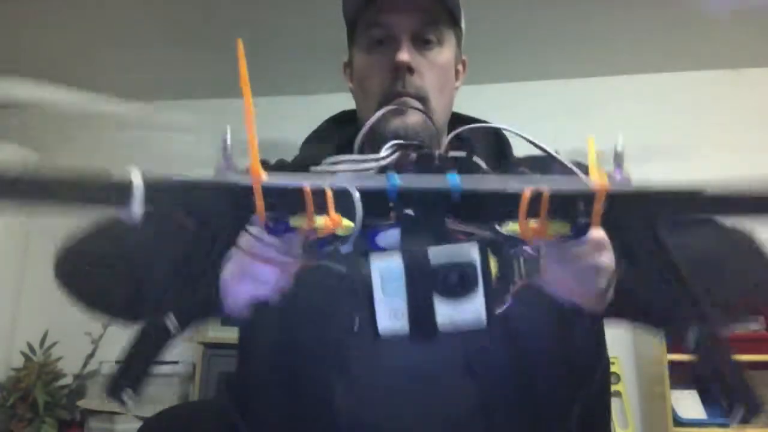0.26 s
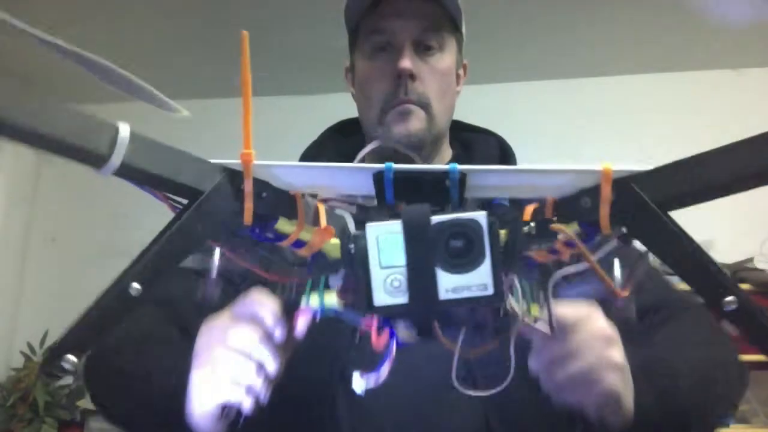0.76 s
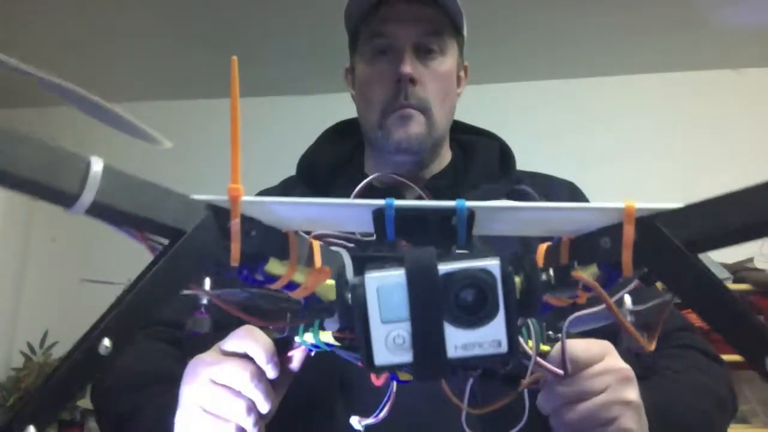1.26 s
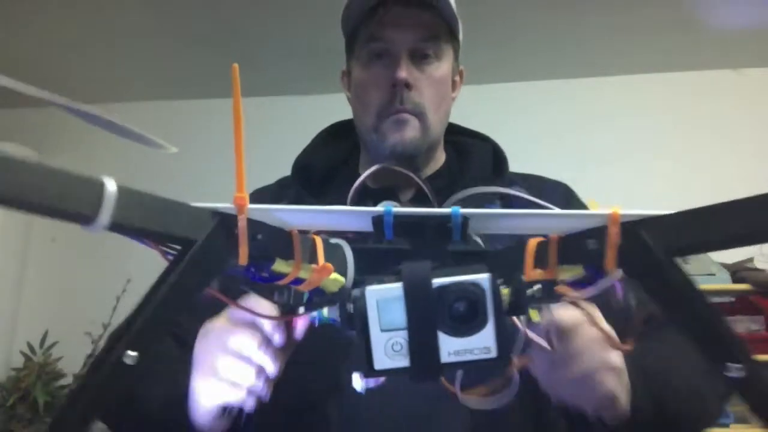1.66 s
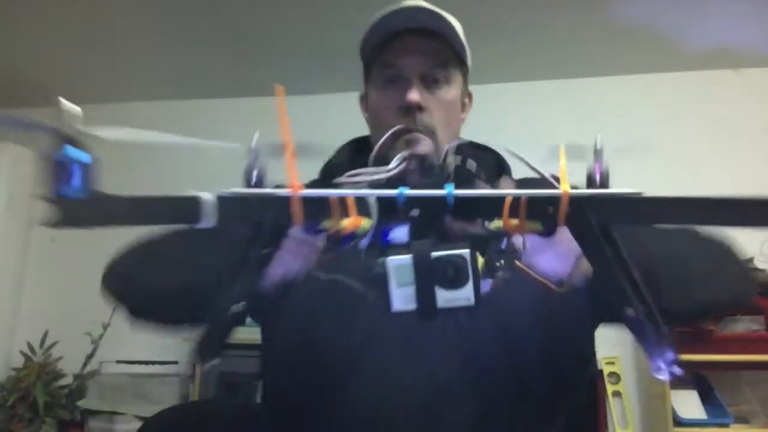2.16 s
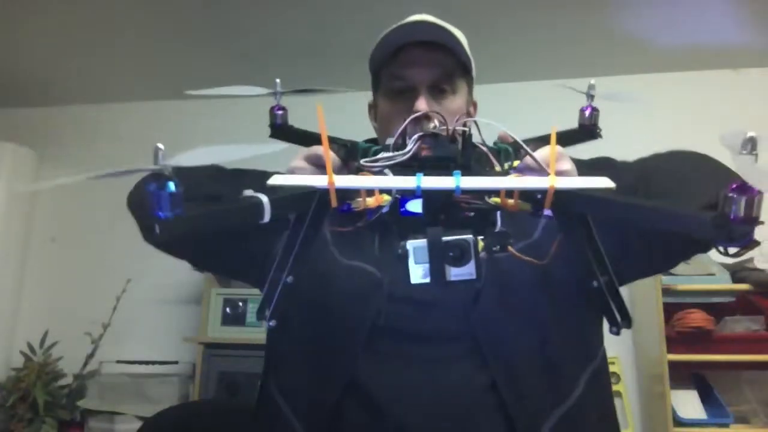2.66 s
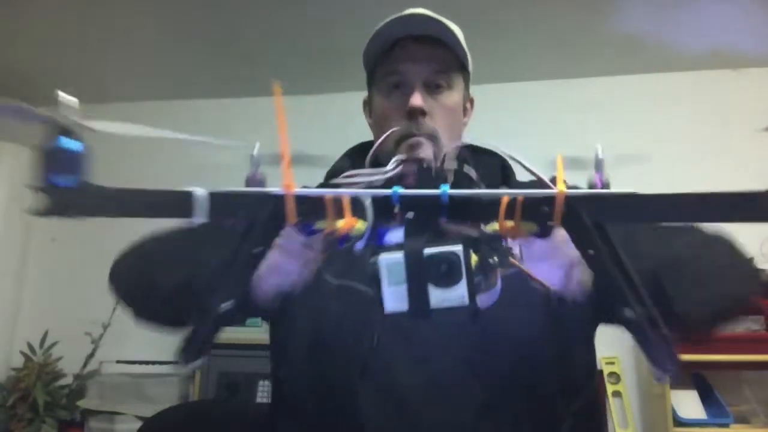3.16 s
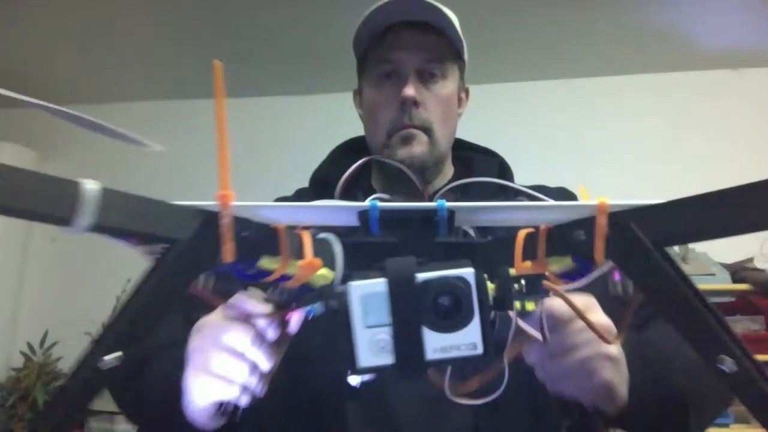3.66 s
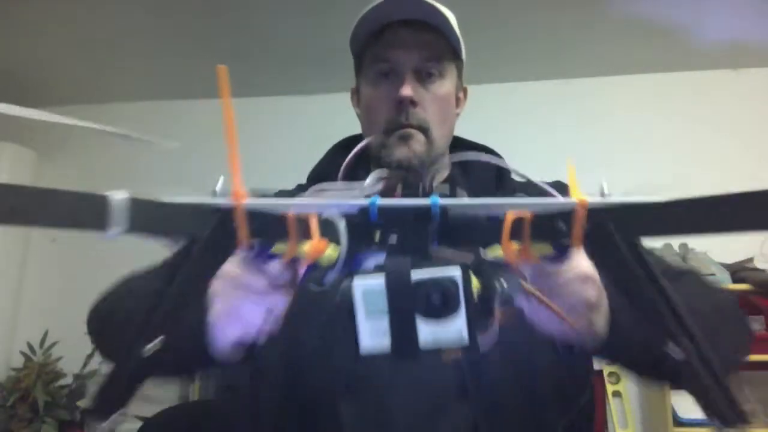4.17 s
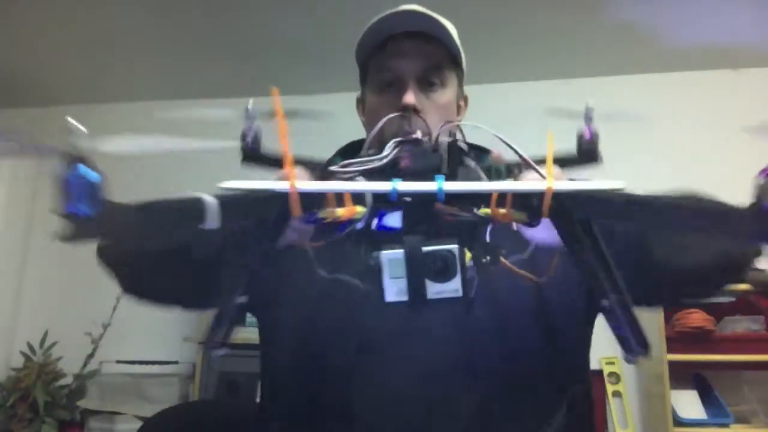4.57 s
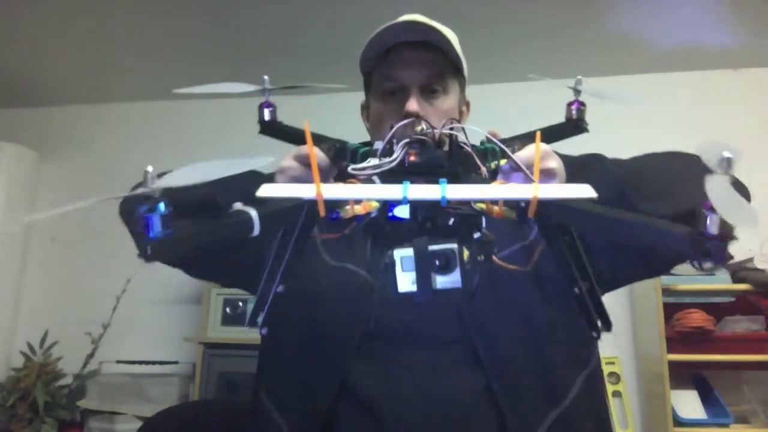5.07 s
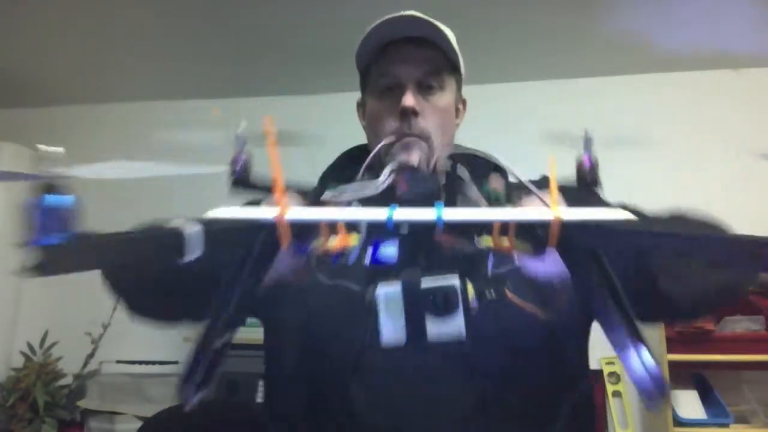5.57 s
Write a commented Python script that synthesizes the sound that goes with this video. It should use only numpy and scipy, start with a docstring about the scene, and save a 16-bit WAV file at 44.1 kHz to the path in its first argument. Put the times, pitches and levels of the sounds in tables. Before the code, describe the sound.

A small servo on a hand-held quadcopter chatters in dry, bright, buzzy ticks and rasps, starting and stopping over a faint steady electrical hum.

```python
"""Gear chatter of a hand-held quadcopter

A quadcopter is tilted to and fro indoors, and the servo of its camera mount works to follow. It takes a
command fifty times a second; each drive pulse jerks the small motor, and uneven gear strikes ring the case.
The airframe adds short knocks and fingers rustle on it, and sparse reflections give the room.
Mains hum, a stack of steady tones, lies underneath with shaped noise as hiss.
"""
import sys
import numpy as np
from scipy import signal
from scipy.fft import rfft, irfft
from scipy.io import wavfile
from scipy.ndimage import uniform_filter1d

SR = 44100
rng = np.random.default_rng(int(sys.argv[2]) if len(sys.argv) > 2 else 0)


def unload_wav(signal):
    """Save mono or channel-first audio to the path in sys.argv[1] as 16-bit WAV at rate SR, clipped to [-1, 1]."""
    wavfile.write(
        sys.argv[1],
        SR,
        np.round(np.clip(np.atleast_2d(signal).T, -1, 1) * 32767).astype(np.int16),
    )


N = 255780
FRAME_HZ = 50.065  # servo command rate


def gain_of(db):
    """Decibels to amplitude."""
    return 10 ** (np.asarray(db) / 20)


def evened(x):
    """Scales to rms 1."""
    return x / np.sqrt(np.mean(x ** 2) + 1e-20)


def add(mix, s, sound):
    """Mixes a sound in at s seconds, cut off at the end of the mix."""
    part = mix[..., round(s * SR):][..., :sound.shape[-1]]
    part += sound[..., :part.shape[-1]]


def wobble(rate):
    """Slow random curve of rms 1: eight sines up to rate (Hz), the slower ones stronger."""
    t = np.arange(0, N, 256) / SR
    rates = np.geomspace(rate / 10, rate, 8)
    slow = sum(np.sin(2 * np.pi * (f * t + rng.random())) / np.sqrt(f) for f in rates)
    return np.interp(np.arange(N) / SR, t, evened(slow))


# Tilt of the craft towards the listener. Each row: time in seconds, tilt from 0 (level and far) to 1 (tipped, near).
TILT = [(0, 0.83), (.3, 0.9), (.8, 0.83), (1.5, 0.98), (2.0, 0.3), (2.5, 0.15), (3.0, 0.53), (3.4, 1),
        (3.75, 0.93), (4.2, 0.58), (4.7, 0.019), (5.0, 0.35), (5.3, 0.36), (5.5, 0.58), (5.8, 0.68)]


def tilt(t):
    """Tilt at times t, in straight lines between the rows."""
    return np.clip(np.interp(t, *np.transpose(TILT)), 0, 1.3)


# The servo runs forward first and reverses at these times in seconds.
REVERSALS = [.87, 2.55, 3.6, 4.8]
REVERSE_S = .05  # time a reversal takes


def backward(t):
    """0 while the servo runs forward, 1 while it runs back."""
    return sum((-1) ** k * np.clip((t - s) / REVERSE_S + .5, 0, 1) for k, s in enumerate(REVERSALS))


def posed(values, t):
    """Blends values for forward level, forward tipped, back level, back tipped by tilt and direction."""
    forward_level, forward_tipped, back_level, back_tipped = values
    forward = forward_level + (forward_tipped - forward_level) * tilt(t)
    back = back_level + (back_tipped - back_level) * tilt(t)
    return forward * (1 - backward(t)) + back * backward(t)


# Drive pulses heard one by one, strong and faint, singly or in runs.
# Each row: start in seconds, relative level in dB, time driven in ms.
JERKS = [(0.008, -20, 4.1), (0.028, -27.5, 22), (0.048, -33, 28), (0.088, -26.5, 6.9), (0.108, -41, 9.5),
         (0.128, -25.5, 8.9), (0.148, -32.5, 10), (0.168, -33, 8.6), (0.198, -31, 1.6), (0.248, -42, 9.9),
         (0.307, -24.5, 3.7), (0.327, -31, 9.3), (0.407, -39.5, 30), (0.467, -25.5, 3.4),
         (0.527, -36.5, 27), (0.965, -31.5, 7.3), (1.005, -35, 13), (1.026, -41, 3.9), (1.066, -31, 12),
         (1.146, -27, 5.7), (1.206, -37.5, 6.4), (1.286, -29.5, 5), (1.346, -30.5, 2.1), (1.366, -35, 34),
         (1.426, -35.5, 23), (1.466, -31, 23), (1.545, -34, 15), (1.565, -30.5, 16), (1.605, -34.5, 6.7),
         (1.645, -40, 11), (1.665, -31, 14), (1.705, -31, 15), (1.725, -26.5, 13), (1.765, -32.5, 2.9),
         (1.785, -31.5, 21.4), (1.825, -30.5, 18), (1.865, -28, 12), (1.885, -33.5, 31), (1.925, -29.5, 13),
         (1.965, -29.5, 20), (2.005, -28, 15), (2.025, -27, 14), (2.065, -34.5, 15), (2.105, -38.5, 5),
         (2.125, -32.5, 13), (2.145, -33.5, 29), (2.225, -33.5, 6.9), (2.305, -36, 20), (2.365, -37.5, 9.6),
         (2.385, -34.5, 5.4), (2.485, -34.5, 13), (2.525, -41.5, 4.3), (3.483, -37, 1.3),
         (3.543, -42.5, 2.2), (3.662, -37.5, 26), (3.742, -35.5, 26), (3.762, -38.5, 20), (3.782, -34, 33),
         (3.862, -40, 28), (3.882, -40, 34), (3.961, -36, 17), (4.002, -35.5, 21), (4.042, -33.5, 25),
         (4.102, -32.5, 11), (4.122, -30, 16), (4.163, -31.5, 20), (4.203, -31, 44), (4.243, -30.5, 21),
         (4.303, -37, 28), (4.323, -32, 20), (4.343, -32, 25), (4.403, -34.5, 14), (4.423, -34, 20),
         (4.482, -35.5, 16), (4.543, -42, 14), (4.582, -42, 14), (4.602, -32, 26.4), (4.662, -40, 7),
         (4.721, -34.5, 6.6), (4.862, -45, 4.6), (4.921, -43, 5.3), (4.961, -46, 7.4), (5.66, -33, 3.5),
         (5.68, -33.5, 1), (5.7, -31, 1), (5.72, -40.5, 1.4), (5.76, -38, 0.96), (5.78, -30, 2.3)]
# Case resonances, one list for each of eight radiating faces.
# Each row: centre in Hz, width of each smoothing pass in Hz, relative level in dB.
CASE = [
    [(4130, 190, -8.5), (5190, 440, -1.5)],
    [(4735, 410, 0)],
    [(6250, 410, 5), (6930, 340, 2.5), (7700, 160, 6)],
    [(7800, 860, -1.5), (8614, 616, 5)],
    [(10275, 1340, -6)],
    [(11030, 950, -3.5), (11810, 1160, -0.5), (13260, 750, -0.5)],
    [(15600, 600, -3)],
    [(13700, 620, -7.5), (14400, 650, -1)],
]
# Level of the first seven faces against the last.
# Each row: forward level, forward tipped, back level, back tipped, all in dB.
FACING = [(-29, -5.5, -36.5, -8), (-18.5, -9.5, -36, -16), (-10, -23.5, -26, -19), (-29, -3.5, -24.5, -5.5),
          (4.5, -8.5, 3.5, 1), (-7.5, -6.5, -11, -3.5), (1, 0.5, -22, 4)]
# Kick as slack is taken up. Columns: forward level, forward tipped, back level, back tipped, as shares of the load.
KICK = (0.21, 0.6, 1.1, 2.5)
DRIFT, DRIFT_PER_S = .022, 9.  # rms share by which resonances wander with grip and gear position; fastest Hz
LIGHT_DB, THIN_DB = -41.5, 1.5  # weaker pulses move larger parts less: dB an octave for each dB under
TICK_FORWARD_DB, TICK_BACK_DB = 7, 12  # the first tooth strikes at once, against the load that follows
REBOUND_DB = -13.5  # typical level of the extra knock when running back


def servo(colour_db=2.3):
    """Gear strikes under each pulse ring the case; each pulse favours other resonances."""
    pulses = list(JERKS) + sweep_pulses()
    t = np.arange(N) / SR
    faces = [posed(row, t) for row in FACING] + [0]
    modes = [(mode, face_db) for side, face_db in zip(CASE, faces) for mode in side]
    chance = rng.standard_normal((len(pulses), len(modes)))
    colours = evened(chance + np.roll(chance, 1, axis=0))  # neighbours in the list share some colour
    octaves = np.log2([mode[0] / 14000 for mode, _ in modes])
    load, ticks = np.zeros((2, len(modes), N))
    rebounds_db = REBOUND_DB + 1.0 * rng.standard_normal(len(pulses))
    for (start, db, ms), colour, rebound_db in zip(pulses, colours, rebounds_db):
        back = backward(start) > .5
        thinning_db = THIN_DB * max(LIGHT_DB - db, 0) * octaves
        force = gain_of(db + colour_db * colour + thinning_db)[:, None]
        add(load, start, force * jerk(ms, back, posed(KICK, start), rebound_db))
        add(ticks, start + .001, force * gain_of(TICK_BACK_DB if back else TICK_FORWARD_DB))
    strikes = teeth()
    case = np.zeros(N)
    for k, ((hz, width, db), face_db) in enumerate(modes):
        drifting_hz = hz * (1 + DRIFT * wobble(DRIFT_PER_S))
        struck = strikes * settle(load[k], hz) + ticks[k]
        case += gain_of(db + face_db) * gliding(struck, drifting_hz, width)
    return gain_of(8.5) * case


# Runs with a pulse in every frame, rising and falling; one list for each unbroken stretch.
# Each row: time in seconds, relative level in dB.
RUNS = [
    [(.06, -47.5), (.435, -37)],
    [(.48, -34), (.575, -43)],
    [(.6, -45.5), (.65, -41.5), (.675, -44.5)],
    [(.7, -42.5), (.775, -42)],
    [(2.56, -50.5), (2.65, -37.5), (2.76, -36), (2.9, -34), (3.04, -34), (3.17, -32.5), (3.22, -43.5),
     (3.3, -33.5), (3.44, -44), (3.51, -40)],
    [(4.99, -46.5), (5.06, -41.5), (5.09, -43)],
    [(5.11, -50.5), (5.17, -29.5), (5.25, -37), (5.35, -30), (5.44, -32), (5.6, -26.5), (5.65, -32)],
]
# The drive starts when the command pulse ends, earlier as the mount tips: lag in the frame.
LAG_LEVEL_MS, LAG_TIPPED_MS = 8.3, 7.0


def sweep_pulses(ms=5.0, spread_db=2.3, spread=0.25):
    """One pulse in every command frame of a run, each a little different in level and length."""
    rows = []
    for run in RUNS:
        s, db = np.transpose(run)
        t = np.arange(np.ceil(s[0] * FRAME_HZ - .4), s[-1] * FRAME_HZ - .4) / FRAME_HZ
        t = t + (LAG_LEVEL_MS + (LAG_TIPPED_MS - LAG_LEVEL_MS) * tilt(t)) / 1000
        chance = rng.standard_normal((len(t), 2))
        levels_db = np.interp(t, s, db) + spread_db * chance[:, 0]
        rows += list(zip(t, levels_db, ms * np.exp(spread * chance[:, 1])))
    return rows


REBOUND_S = .031  # from the start of the pulse


def jerk(ms, back, kick, rebound_db, kick_s=0.0024, rise_s=0.0005, coast_s=0.0058, sag=14.7):
    """Gear load of one pulse: a kick takes up slack, the drive sags in each frame, then coasts to rest."""
    driven_s = ms / 1000
    t = np.arange(round((driven_s + .04) * SR)) / SR
    coast_s = coast_s * min(.5 + ms / 12, 1)  # a short pulse comes to rest sooner
    driven = np.exp(-sag * (t % (1 / FRAME_HZ)) - np.maximum(t - driven_s, 0) / coast_s)
    rise = (1 - np.exp(-t / rise_s)) ** 2
    kicked = (1 + kick * np.exp(-t / kick_s)) / np.sqrt(1 + kick)
    # running back, the gears knock once more as the slack closes the other way
    rebound = back * gain_of(rebound_db) * (t > REBOUND_S) * np.exp(-abs(t - REBOUND_S) / kick_s)
    return rise * driven * kicked + rebound


MESH_PER_S, MESH_DB = 260, 7  # big teeth a second, about; lift at each before the whole is evened


def teeth(per_s=5000, spread_db=-4.0, hiss=0.75):
    """Gear teeth strike unevenly over a finer rubbing; each big tooth tightens the mesh for a moment."""
    sizes = gain_of(spread_db * np.minimum(rng.exponential(1, N), 4))
    strikes = sizes * (rng.random(N) < per_s / SR)
    speed_db = 1.7 * evened(uniform_filter1d(rng.standard_normal(N), size=300))
    turns = np.cumsum(MESH_PER_S * gain_of(speed_db)) / SR
    flutter_db = 1.4 * evened(uniform_filter1d(rng.standard_normal(N), size=160))
    mesh = gain_of(MESH_DB * np.exp(-(turns % 1) / 0.17) + flutter_db)
    signed = evened(strikes * rng.choice([-1, 1], N))
    return evened(mesh * (signed + hiss * rng.standard_normal(N)))


def settle(load, hz, cycles=3.0):
    """Lower resonances belong to larger parts, which take up the load more slowly and let it go later."""
    r = np.exp(-hz / SR / cycles * (hz / 5000))
    return signal.lfilter([1 - r], [1, -r], load)


def gliding(x, hz, width):
    """A resonance that follows the curve hz: shift to zero, smooth twice, shift back."""
    turn, r = np.exp(2j * np.pi * np.cumsum(hz) / SR), np.exp(-np.pi * width / SR)
    smooth = signal.lfilter([(1 - r) ** 2], [1, -2 * r, r ** 2], x * turn.conj())
    return 2 * (turn * smooth).real


# Centre of the band the deck plate throws back out of step.
# Columns: forward level, forward tipped, back level, back tipped, all in Hz.
DIP_HZ = (7870, 10130, 9000, 6560)
# Share by which a second band is cancelled. Columns: forward level, forward tipped, back level, back tipped.
NOTCH = (.7, 0.1, 0.49, 0.29)
NOTCH_HZ = 12900


def deck(gears):
    """The deck plate throws sound back out of step, hollowing a moving band; a second band is weakened too."""
    t = np.arange(N) / SR
    hollow = cancelled(gears, posed(DIP_HZ, t), 0.62, 1420.0)
    return cancelled(hollow, np.full(N, NOTCH_HZ), posed(NOTCH, t), 900.)


def cancelled(x, hz, depth, width):
    """Takes a band away: shift it to zero, smooth, shift back, subtract."""
    turn, r = np.exp(2j * np.pi * np.cumsum(hz) / SR), np.exp(-np.pi * width / SR)
    return x - depth * 2 * (turn * signal.lfilter([1 - r], [1, -r], x / turn)).real


# Frame knocks. Each row: start in seconds, relative level in dB, extra level of the highest ring in dB.
KNOCKS = [(.109, -52, -1.5), (.529, -55.5, 0), (4.326, -72.5, 13.5), (4.424, -59.5, -2),
          (4.605, -71.5, 10.5), (5.582, -46, 0.5), (5.592, -47, -11), (5.665, -50, -12)]
# What the airframe rings with. Each row: centre in Hz, width of each filter pass in Hz, relative level in dB.
FRAME = [(2000, 280, -6), (2473, 330, -0.5), (3200, 215, -2.5)]


def knocks(t60=0.034, per_s=500):
    """Short rings of the airframe: one blow and a few quick bounces."""
    blows, t = np.zeros((len(FRAME), N)), np.arange(3000) / SR
    for s, db, high_db in KNOCKS:
        bounces = rng.standard_normal(len(t)) * (rng.random(len(t)) < per_s / SR)
        burst = bounces * gain_of(-60 * t / t60) + (t == 0)
        add(blows, s, gain_of([[db], [db], [db + high_db]]) * burst / np.linalg.norm(burst))
    # narrow resonances are raised to make up for the little they let through
    return sum(gain_of(db) * resonate(blow, hz, width) * hz / width * 10
               for blow, (hz, width, db) in zip(blows, FRAME))


def resonate(x, hz, width):
    """One resonance of gain 1 at its centre, applied twice for steep flanks."""
    b, a = signal.iirpeak(hz, hz / width, SR)
    return signal.lfilter(b, a, signal.lfilter(b, a, x))


# Hands shift on the airframe. Each row: start in seconds, length in seconds, level at the peak of the swell in dB.
RUSTLES = [(1.587, 0.24, -63.5)]


def rustle(per_s=1000, spread_db=6.0):
    """Soft dense crackle of fingers on the frame, swelling and fading."""
    t = np.arange(N) / SR
    swell = sum(gain_of(db) * np.sin(np.pi * np.clip((t - s) / length, 0, 1)) ** 2
                for s, length, db in RUSTLES)
    sizes = gain_of(spread_db * np.minimum(rng.exponential(1, N), 4))
    grains = sizes * (rng.random(N) < per_s / SR) * rng.choice([-1, 1], N)
    return swell * evened(resonate(grains, 2000.0, 5600.0))


def room(x, t60=0.14):
    """Sparse reflections of random sign, dying away by 60 dB in t60 seconds."""
    at = np.arange(120, 12000, 20)
    taps = np.zeros(12020)
    spots = at + rng.integers(0, 20, len(at))
    taps[spots] = rng.choice([-1., 1.], len(at)) * gain_of(-60 * at / SR / t60)
    return signal.oaconvolve(x, taps / np.linalg.norm(taps))[:N]


# Hum partials at multiples 1, 2, 3 .. of HUM_HZ. Each entry: level in dB rms, before it wavers.
HUM_LEVELS = [-72.5, -70, -57.5, -64.5, -85.5, -82, -78.5, -77.5, -89, -82, -92, -84.5, -84, -84, -84.5,
              -79.5, -74.5, -84, -84, -85.5, -87, -89.5, -84.5, -84.5, -89, -87, -77, -78.5, -89, -99, -89,
              -85.5, -80.5]
HUM_HZ = 120.053


def hum(waver_db=0.56, scatter=0.018):
    """Multiples of twice the mains frequency; low ones keep step as one buzz, higher ones waver more."""
    turn = 2 * np.pi * HUM_HZ * np.arange(N) / SR
    multiples = np.arange(1, len(HUM_LEVELS) + 1)
    depth_db = waver_db * multiples ** 0.39
    # the first partial is turned over; phases scatter more the higher the multiple
    lag = [np.pi * (k == 1) + 2 * np.pi * min(scatter * k ** 2, 1) * (rng.random() - .5) for k in multiples]
    buzz = np.zeros(N)
    for k, db, depth, phase in zip(multiples, HUM_LEVELS, depth_db, lag):
        buzz += np.sqrt(2) * gain_of(db + depth * wobble(1.966)) * np.cos(k * turn + phase)
    return buzz


# Colour of the hiss. Each row: frequency in Hz, relative spectral level in dB.
FLOOR = [(40, -9), (90, -0.5), (300, 6), (600, 4.5), (1200, -0.5), (2400, -3.5), (3800, -3), (4600, -1.5),
         (9000, -13), (16000, -13)]
FLOOR_DB = -69  # whole hiss, dB rms in the mix


def floor():
    """Room and microphone hiss: white noise shaped along a spectral curve."""
    f, db = np.transpose(FLOOR)
    shape = gain_of(np.interp(np.log(np.fft.rfftfreq(N, 1 / SR) + 1), np.log(f + 1), db))
    return gain_of(FLOOR_DB) * evened(irfft(rfft(rng.standard_normal(N)) * shape, N))


def scene():
    """The craft, its echo, hum and hiss."""
    craft = deck(servo()) + knocks() + rustle()
    return (craft + gain_of(-11.5) * room(craft) + hum() + floor())[None]


QUIET_DB, EXPAND = -46.5, 0.15  # the input turns down below this level, by this share of the shortfall
EDGE_HZ = 16974  # band limit


def record(dry):
    """The input sinks a little in quiet moments; the top of the treble steps down, then the band limit."""
    power_db = 10 * np.log10(abs(uniform_filter1d(dry ** 2, size=6000)) + 1e-12)
    shortfall_db = uniform_filter1d(np.minimum(power_db - QUIET_DB, 0), size=4000)
    dry = dry * gain_of(EXPAND * shortfall_db)
    step = signal.firwin(255, 15850, window=("kaiser", 7), fs=SR)[None]
    dull = signal.oaconvolve(dry, step, "same")
    heard = dull + gain_of(-36) * (dry - dull)  # a trace of the top treble stays
    limit = signal.firwin(511, EDGE_HZ, window=("kaiser", 9), fs=SR)[None]
    return signal.oaconvolve(heard, limit, "same")


dry = scene()
out = record(dry)
unload_wav(out)
```